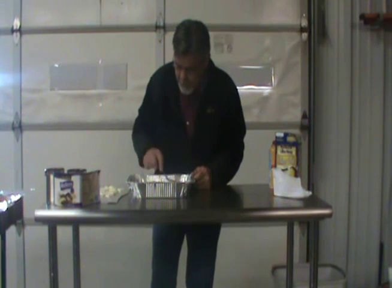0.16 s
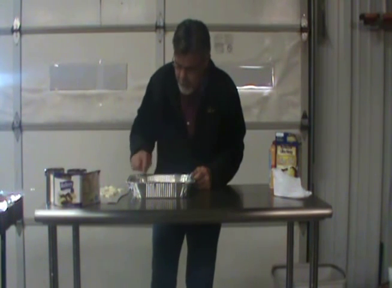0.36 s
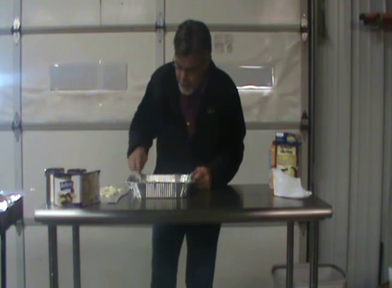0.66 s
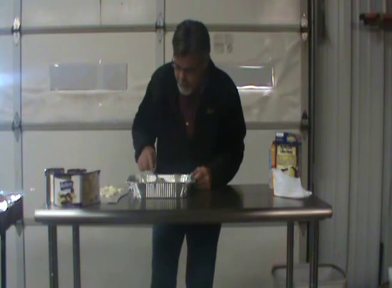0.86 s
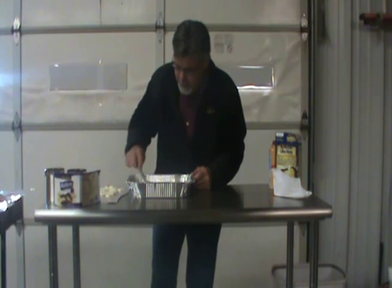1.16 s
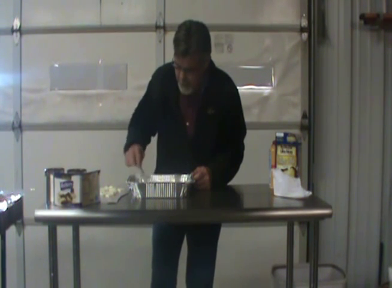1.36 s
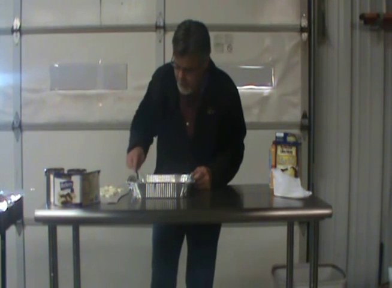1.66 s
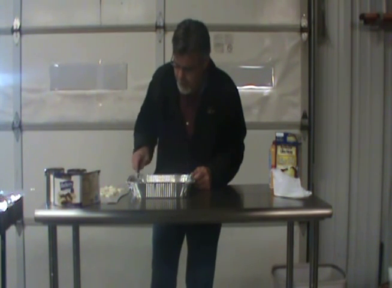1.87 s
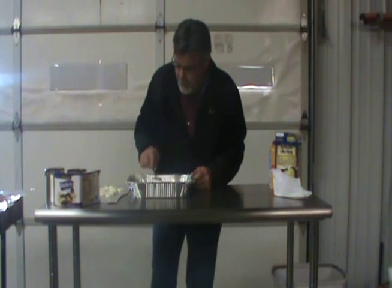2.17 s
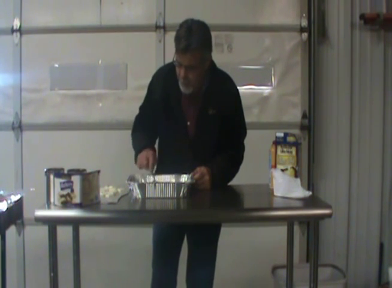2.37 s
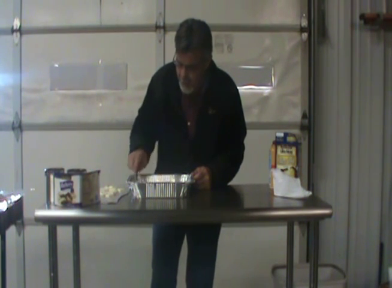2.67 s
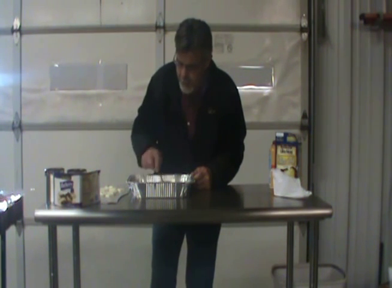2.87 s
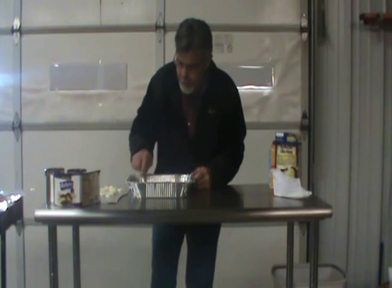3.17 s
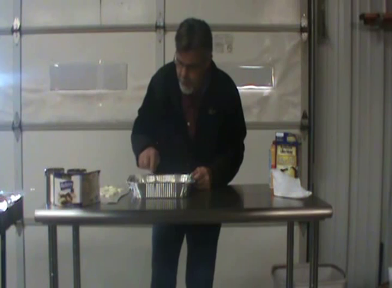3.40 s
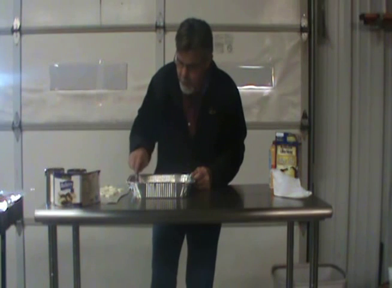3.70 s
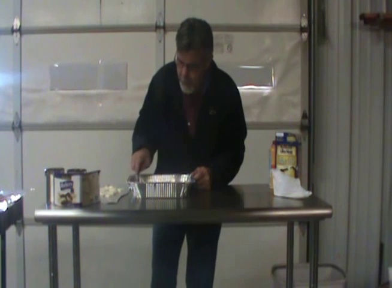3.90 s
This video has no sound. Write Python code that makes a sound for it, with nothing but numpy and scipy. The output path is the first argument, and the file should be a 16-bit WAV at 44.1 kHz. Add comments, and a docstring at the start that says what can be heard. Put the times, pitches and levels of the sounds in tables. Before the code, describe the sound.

Low machine drone in a hard-walled garage, heard from some distance. Soft powder scraping and little foil ticks lead to a rapid dull-to-crackly burst of pan knocks, then a brighter, harder snap with a short metallic tink. Afterwards only small foil pops, a light knock, faint rustles and a tiny tink remain, each trailing a short room echo.

```python
"""Foil pops and crackles, a pan floor rings briefly and powder hisses, over a low machine hum in a garage.
A utensil spreads dry powder in a disposable foil pan on a steel table.
Knocks are short swinging pops, damped ringing and noisy crackle.
The powder's hiss and the foil's short rustles are streams of tiny random clicks.
The hum is wavering sine tones over filtered noise, and the room adds echoes and a fading noise tail."""
import sys
import numpy as np
from scipy import signal
from scipy.fft import rfft, irfft
from scipy.io import wavfile

SR = 44100
rng = np.random.default_rng(int(sys.argv[2]) if len(sys.argv) > 2 else 0)


def inscribe(sig):
    """Save sig as 16-bit PCM at rate SR to the path in sys.argv[1].

    A 1-D sig is mono; a 2-D sig holds one channel per row.
    Samples are clipped to [-1, 1] before scaling.
    """
    pcm = np.round(np.clip(np.atleast_2d(sig).T, -1, 1) * 32767)
    wavfile.write(sys.argv[1], SR, pcm.astype(np.int16))


N = 178252
TIME = np.arange(N) / SR

# Background rumble and hiss. Each row: frequency in Hz, relative level in dB per Hz.
AIR_SPECTRUM = [(20, -16), (38, -18.5), (55, 2.5), (75, -6), (100, 3.5), (140, -1.5), (200, -7.5),
                (400, -18), (750, -23.5), (1500, -25.5), (2200, -25), (3400, -29), (5000, -30), (7000, -31),
                (11000, -31.5), (16000, -35)]
AIR_DB = -66.5  # level of the part above 300 Hz

# Two machine drones; the lower gives way to the upper, then partly returns.
# Each row: time in seconds, lower drone level in dB, upper drone level in dB.
DRONE_LEVELS = [(0, -52.5, -68), (.8, -58, -64.5), (1.1, -74, -62.5), (1.699, -66.5, -59.5),
                (2.2, -77, -57), (4.04, -62, -55)]
LOWER_DRONE_HZ = 103.4
# Pitch of the upper drone, before its random wander. Each row: time in seconds, pitch in Hz.
UPPER_DRONE_PITCH = [(0, 153.9), (1.5, 159.3), (2.2, 157.1), (4.04, 154.1)]
# Faint tones of mains-driven motors and lights. Each row: frequency in Hz, level in dB before a shared trim.
WHINES = [(301.5, -72), (419.9, -76.5), (538.3, -73), (597.5, -83.5), (662.1, -80.5), (1082, -79),
          (2040, -82.5), (4915, -86.5), (10024, -96), (10384, -92), (11719, -81.5), (12080, -94)]

# How long the room rings. Each row: frequency in Hz, time to fall by 60 dB in seconds.
ROOM_DECAY = [(150, 0.31), (500, 0.351), (1000, 0.396), (2500, 0.42), (5000, 0.67), (8000, 0.53),
              (12000, 0.9), (16000, 0.36)]
# Tone of the room's tail. Each row: frequency in Hz, relative level in dB.
ROOM_COLOUR = [(100, 18.5), (400, -0.5), (800, -3), (1400, 1), (2500, -0.5), (5000, 2.5), (8000, -1),
               (11000, -8), (14000, -1.5)]
# Echoes off table, floor, door and ceiling. Each row: delay in seconds, level in dB.
ECHOES = [(.0062, -28), (.0115, -27), (0.0178, -30.5), (.0225, -40)]

# Strokes through the powder. Each row: start in seconds, length in seconds, level in dB.
POWDER_STROKES = [(0, 0.14, -70), (.22, 0.61, -67), (.9, .44, -66.5), (2.2, 0.063, -67.5),
                  (2.59, 0.031, -66.5), (2.71, 0.045, -72), (3.14, 0.15, -70), (3.76, 0.11, -67)]
# Tone of the powder's hiss. Each row: frequency in Hz, relative level in dB.
POWDER_COLOUR = [(300, -23), (900, 2), (1300, 2), (2000, -1), (2700, 4), (3700, -8), (5000, 2.5),
                 (6200, -3.5), (8000, -4), (10500, -12.5), (15000, -13)]
# Short noisy rustles and ticks of the foil. Each row: start in seconds, length in seconds, level in dB.
FOIL_RUSTLES = [(.576, .028, -58), (1.381, 0.018, -51), (2.72, 0.014, -45), (2.766, 0.0026, -54),
                (3.243, .018, -64), (3.831, .012, -55), (3.849, 0.0051, -47), (3.871, 0.032, -55.5),
                (3.9, .023, -53.5)]
# Tone of the rustles and of the dimples' crackle. Each row: frequency in Hz, relative level in dB.
RUSTLE_COLOUR = [(300, -18.5), (800, -0.5), (1450, 2), (2200, 3), (3500, -5), (5500, -3), (9000, -4.5),
                 (11500, -13.5), (15500, -24.5)]

# Small dimples flex in the foil, leaving the floor still. Each row: time in seconds, level in dB, pitch in Hz.
DIMPLES = [(0.13, -50.5, 1170), (0.317, -48, 1110), (0.563, -46.5, 7360), (0.592, -41, 1320),
           (0.637, -46.5, 1070), (1.355, -47.5, 2500), (1.3807, -41.5, 980), (1.3881, -36.5, 2500),
           (2.7302, -40, 1170), (2.7671, -47, 1500), (3.194, -47.5, 1220), (3.21, -45, 1210),
           (3.343, -45, 1420), (3.797, -47.5, 2100), (3.849, -37.5, 1500), (3.886, -43, 1440)]
# Tight dimples crackle; slack ones, with a pitch below TIGHT_HZ, hardly do.
DIMPLE_CRACKLE_DB, TIGHT_HZ, SLACK_DB_PER_OCTAVE = -6.5, 1900, 9

# The utensil's blade rings against the rim. Each row: time in seconds, level in dB.
TINKS = [(1.7012, -22), (1.706, -23.5), (3.647, -41.5)]
# Tones of the blade, damped by the hand. Each row: frequency in Hz, relative level in dB.
BLADE_MODES = [(4750, -1), (6600, -13)]

# The utensil knocks the pan in two clatters, then once more. Each row: time in seconds, pop level in dB,
# pitch of the buckling patch in Hz, relative floor ring level in dB, relative foil crackle level in dB.
KNOCKS = [ (1.0325, -23, 750, -19, -21.5), (1.0383, -32.5, 1080, -56, -42), (1.0496, -31.5, 1020, -40, -33),
          (1.066, -31, 790, -26.5, -30), (1.072, -24, 780, -34, -42), (1.0978, -35.5, 775, -27, -31),
          (1.1066, -24, 1030, -27, -31), (1.1152, -25, 600, -20, -31.5), (1.1198, -32.5, 1110, -33, -32.5),
          (1.1271, -19.5, 685, -26.5, -17.5), (1.1306, -31, 865, -20, -28),
          (1.1443, -38.5, 600, -47, -35.5), (1.7012, -24, 810, -25.5, -18.5),
          (1.7055, -20, 2400, -28, -22.5), (1.7086, -21, 2400, -44, -29.5), (1.7665, -24, 2830, -35, -26.5),
          (1.7728, -9, 2232, -23, -12.5), (1.7757, -16.5, 2900, -36, -31), (1.8041, -24, 2380, -49.5, -28),
          (2.7214, -31, 1120, -51, -39)]
# The pan bumps the table. Each row: time in seconds, level in dB, pitch in Hz.
BUMPS = [(1.0319, -52, 239), (1.1258, -26, 338), (1.7013, -44.5, 241.4), (1.7733, -25, 387)]
# Tones of the powder-damped pan floor.
# Each row: frequency in Hz, relative level in dB, time to fall by 60 dB in seconds.
FLOOR_MODES = [(335, -19.5, 0.111), (446, -14.5, .06), (561, -5, 0.052), (600, -5, 0.053), (755, -1, 0.041),
               (905, -6, 0.026), (1207, 1.5, 0.025)]
# Sharp tones of the foil walls.
# Each row: frequency in Hz, relative level in dB, time to fall by 60 dB in seconds.
WALL_MODES = [(2320, 4, 0.04), (2640, 7.5, 0.0365), (3320, -6, 0.048), (4670, -10, .025),
              (4990, -9.5, 0.088), (6480, 5, 0.028)]
# Tone of a foil crackle. Each row: frequency in Hz, relative level in dB.
CRACKLE_COLOUR = [(150, -22.5), (600, 0), (1300, 7), (1800, -3.5), (2800, 5), (3800, -2), (4800, -0.5),
                  (6000, -5.5), (8000, -4.5), (10200, -10.5), (12500, -22), (16000, -29)]

EDGE_HZ = 16200  # upper limit of the recorder
OFFSET = -0.0131  # constant shift, as a share of full scale


def amp(db):
    """Turns decibels into a gain."""
    return 10 ** (np.asarray(db) / 20)


def evened(x):
    """Scales a sound to an average (rms) level of 1."""
    return x / np.sqrt(np.mean(x ** 2) + 1e-20)


def read(points, hz):
    """Reads a spectrum table at the frequencies hz, on a logarithmic scale."""
    f, value = np.transpose(points)
    return np.interp(np.log(hz + 1), np.log(f + 1), value)


def curves(rows):
    """Draws straight lines between the rows of a time table, one curve per column."""
    s, *columns = np.transpose(rows)
    return [np.interp(TIME, s, column) for column in columns]


def add(mix, s, sound):
    """Mixes a sound in at time s, in seconds."""
    start = max(round(s * SR), 0)
    part = mix[start:][:len(sound)]
    part += sound[:len(part)]


def colour(x, points, size=4096):
    """Shapes the tone with a filter of unit energy that never sounds ahead of its input."""
    hz = abs(np.fft.fftfreq(size, 1 / SR))
    log_gain = np.log(amp(read(points, hz)))
    # this choice of phase puts the energy as early as possible
    response = np.exp(np.conj(signal.hilbert(log_gain)))
    taps = np.fft.ifft(response).real[:size // 2]
    return signal.fftconvolve(x, taps / np.linalg.norm(taps))[:len(x)]


def drift(rate_hz):
    """Slow random wandering with an rms of 1; a higher rate wanders faster."""
    hz = np.fft.rfftfreq(N, 1 / SR)
    slow = rfft(rng.standard_normal(N)) * np.exp(-(hz / rate_hz) ** 2)
    return evened(irfft(slow, N))


def ring(modes, t):
    """Tones struck together, each dying away at its own speed."""
    return sum(amp(db - 60 * t / t60) * np.sin(2 * np.pi * hz * t) for hz, db, t60 in modes)


def pop(hz, t, cycles):
    """A short swing that swells to its peak after the given number of cycles, then dies away."""
    u = t * hz / cycles
    return u * np.exp(1 - u) * np.sin(2 * np.pi * hz * t)


def disperse(x, lag_s):
    """Bending waves in thin foil travel faster when higher: the snap comes before the thock."""
    hz = np.fft.rfftfreq(N, 1 / SR)
    # lag_s is the delay at 1 kHz
    delay_phase = np.exp(-4j * np.pi * lag_s * np.sqrt(1000 * hz))
    return irfft(rfft(x) * delay_phase, N)


def air():
    """Steady room rumble thinning out into hiss, made from filtered noise."""
    hz = np.fft.rfftfreq(N, 1 / SR)
    spectrum = rfft(rng.standard_normal(N)) * amp(read(AIR_SPECTRUM, hz))
    hiss_rms = np.std(irfft(spectrum * (hz > 300), N))
    return amp(AIR_DB) * irfft(spectrum, N) / hiss_rms


def wandering_tone(hz, wander_hz, rate_hz):
    """A sine whose pitch strays randomly, made by adding up its changing frequency."""
    return np.sin(2 * np.pi * np.cumsum(hz + wander_hz * drift(rate_hz)) / SR)


def hum(waver_db=1.12, wander_hz=1.27, whine_wander_hz=3.0, whine_trim_db=-2.5):
    """Two machine drones wavering in level and pitch, and some faint whines wavering in pitch."""
    out = np.zeros(N)
    pitches = [LOWER_DRONE_HZ, curves(UPPER_DRONE_PITCH)[0]]
    for db, hz in zip(curves(DRONE_LEVELS), pitches):
        level = amp(db + waver_db * drift(5.57))
        out += level * wandering_tone(hz, wander_hz, rate_hz=6.0)
    for hz, db in WHINES:
        out += amp(db + whine_trim_db) * wandering_tone(hz, whine_wander_hz, rate_hz=14.8)
    # a sine's rms is below its peak, so this makes the levels rms levels
    return np.sqrt(2) * out


def garage(x, tail_db=-13, build_s=0.0087):
    """A spread-out noise tail that builds up quickly, then dies at its own speed in each band."""
    hz, t, bands = signal.stft(rng.standard_normal(SR), SR, nperseg=256)
    start_db = read(ROOM_COLOUR, hz)[:, None]
    fall_db = 60 * t / read(ROOM_DECAY, hz)[:, None]
    tail = signal.istft(bands * amp(start_db - fall_db), SR, nperseg=256)[1][:SR]
    tail = tail * (1 - np.exp(-(TIME[:SR] / build_s) ** 2))
    return signal.fftconvolve(x, amp(tail_db) * tail / np.linalg.norm(tail))[:N]


def echoes(x):
    """The direct sound and its first reflections, as delayed fainter copies."""
    out = x.copy()
    for s, db in ECHOES:
        add(out, s, amp(db) * x)
    return out


def swells(rows, attack_s, release_s):
    """A level curve that rises, holds and eases off for each row of a table."""
    out = np.zeros(N)
    for start, length, db in rows:
        rise = np.minimum(TIME / attack_s, 1)
        ease = np.exp(-np.maximum(TIME - length, 0) / release_s)
        add(out, start, amp(db) * rise * ease)
    return out


def grains(level, spectrum, grains_per_s, spread_db, clump_db):
    """Many tiny clicks of uneven size at random moments, coming in clumps."""
    size_db = spread_db * np.minimum(rng.exponential(1, N), 4)
    sizes = amp(size_db) * rng.choice([-1, 1], N)
    clicks = evened(sizes * (rng.random(N) < grains_per_s / SR))
    clumps = amp(clump_db * drift(60))
    return colour(clicks * level * clumps, spectrum)


def powder():
    """Dry grains slip in tiny uneven steps and hiss under each stroke."""
    level = swells(POWDER_STROKES, attack_s=0.039, release_s=0.039)
    return grains(level, POWDER_COLOUR, grains_per_s=6200, spread_db=1.5, clump_db=0.5)


def foil_rustle():
    """Short noisy rustles and ticks of the foil, made of tiny uneven clicks."""
    level = swells(FOIL_RUSTLES, attack_s=0.0048, release_s=0.0066)
    return grains(level, RUSTLE_COLOUR, grains_per_s=3000, spread_db=3.0, clump_db=0.5)


def dimples(snap_s=0.00147, rustle_s=0.008, rustle_db=-22):
    """Each dimple pops softly, with a pinch of crackle that grows with its tightness."""
    t = np.arange(SR // 16) / SR
    pops, creases = np.zeros(N), np.zeros(N)
    burst = np.exp(-t / snap_s) + amp(rustle_db) * np.exp(-t / rustle_s)
    for s, db, hz in DIMPLES:
        slack_octaves = max(np.log2(TIGHT_HZ / hz), 0)
        crackle_db = db + DIMPLE_CRACKLE_DB - SLACK_DB_PER_OCTAVE * slack_octaves
        add(pops, s, amp(db) * pop(hz, t, cycles=0.79))
        add(creases, s, amp(crackle_db) * burst * rng.standard_normal(len(t)))
    return disperse(pops + colour(creases, RUSTLE_COLOUR), lag_s=0.000377)


def tink():
    """The blade gives short, pitched ticks as its tones swing together."""
    out = np.zeros(N)
    for s, db in TINKS:
        for hz, mode_db in BLADE_MODES:
            add(out, s, amp(db + mode_db) * pop(hz, TIME[:SR // 16], cycles=2.94))
    return out


def knocks(snap_s=0.0015, rustle_s=0.0072, rustle_db=-22, wall_db=-25, floor_db=-7,
           crease_db=-2, click_db=3, bass_edge_hz=175):
    """Each knock pops a patch, rings the floor and walls, and sets off a click and a burst of tiny creases."""
    t = np.arange(SR // 8) / SR
    body, creases = np.zeros(N), np.zeros(N)
    floor = amp(floor_db) * ring(FLOOR_MODES, t)
    walls = amp(wall_db) * ring(WALL_MODES, t)
    # a quick snap, then a fainter and longer rustle
    burst = amp(crease_db) * np.exp(-t / snap_s) + amp(rustle_db) * np.exp(-t / rustle_s)
    click = amp(click_db) * (t == 0)
    for s, pop_db, hz, ring_db, crackle_db in KNOCKS:
        patch = amp(pop_db) * pop(hz, t, cycles=0.79)
        add(body, s, patch + amp(ring_db) * floor + amp(crackle_db) * walls)
        # the harder the patch pops, the stronger the click that leads its crackle
        crackle = amp(crackle_db) * burst * rng.choice([-1, 1], len(t))
        add(creases, s, amp(pop_db) * click + crackle)
    for s, db, hz in BUMPS:
        add(body, s, amp(db) * pop(hz, t, cycles=0.95))
    foil = disperse(body + colour(creases, CRACKLE_COLOUR), lag_s=0.000492)
    # a small light pan radiates little bass
    bass_cut = signal.butter(3, bass_edge_hz, "high", fs=SR, output="sos")
    return signal.sosfilt(bass_cut, foil)


def radiate(small_sounds, count=3):
    """Crumpled foil sends a different crackle to each side; the room blends them into an even wash."""
    return sum(garage(knocks() + small_sounds) for side in range(count)) / np.sqrt(count)


def scene():
    """The pan in the room, over the hum and air."""
    small_sounds = powder() + foil_rustle() + dimples()
    near = echoes(knocks() + tink() + small_sounds)
    return (near + radiate(small_sounds) + hum() + air())[None]


def record(dry):
    """The recorder cuts the highest treble, and its converter adds a small constant offset."""
    treble_cut = signal.firwin(255, EDGE_HZ, window=("kaiser", 8), fs=SR)
    return signal.oaconvolve(dry, treble_cut[None], "same") + OFFSET


dry = scene()
out = record(dry)
inscribe(out)
```